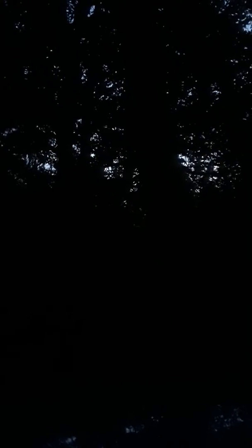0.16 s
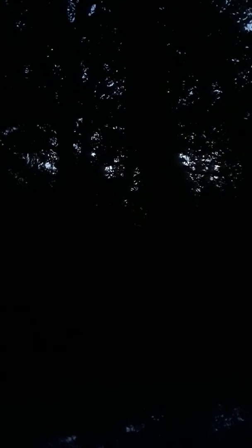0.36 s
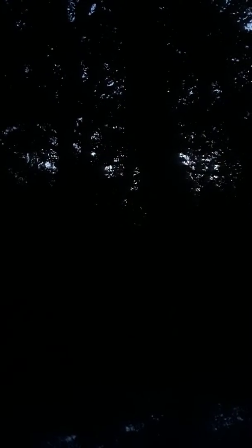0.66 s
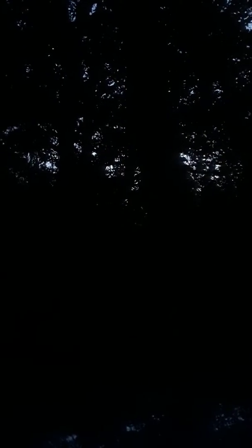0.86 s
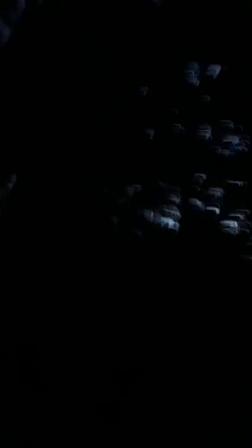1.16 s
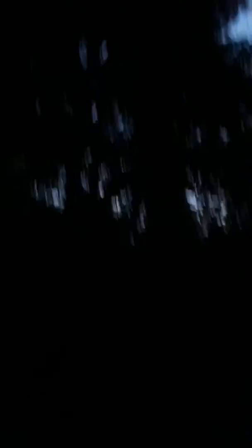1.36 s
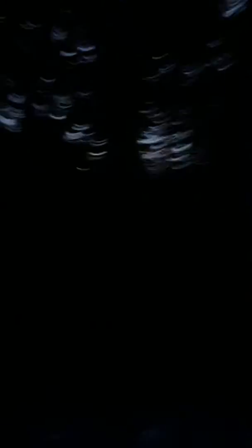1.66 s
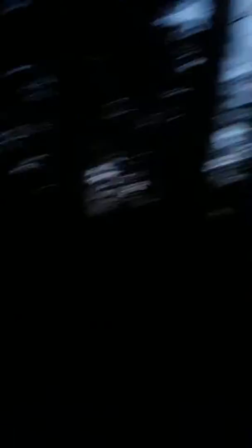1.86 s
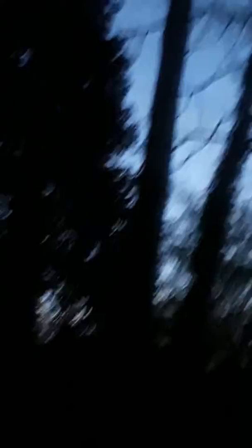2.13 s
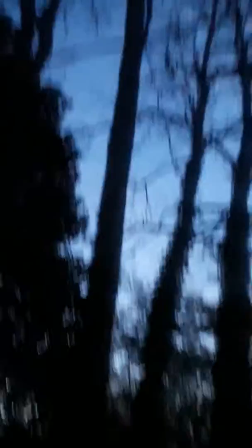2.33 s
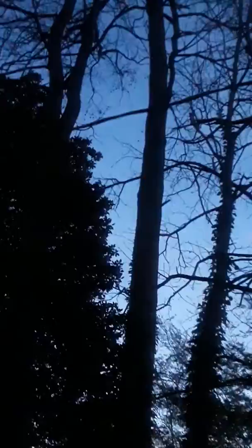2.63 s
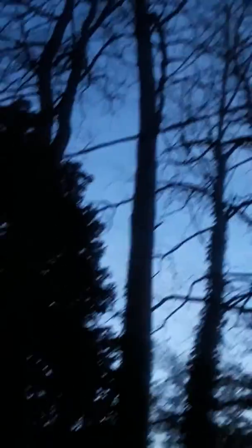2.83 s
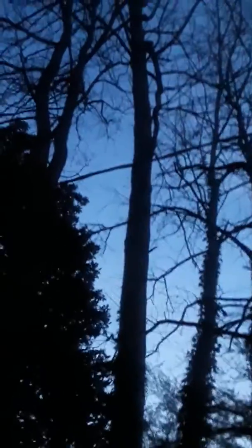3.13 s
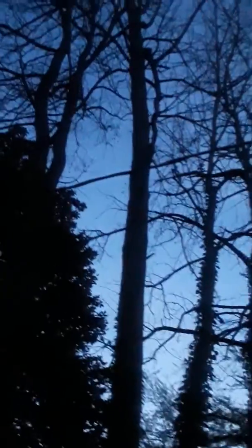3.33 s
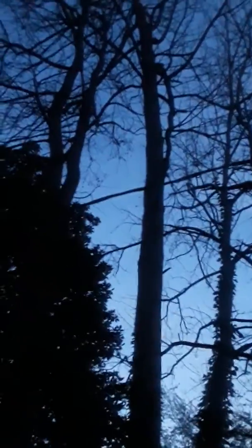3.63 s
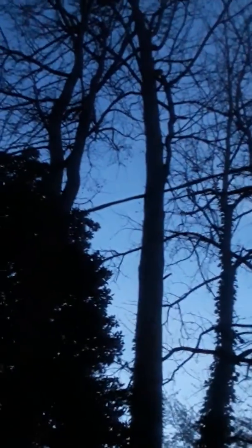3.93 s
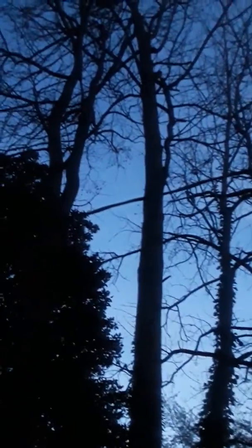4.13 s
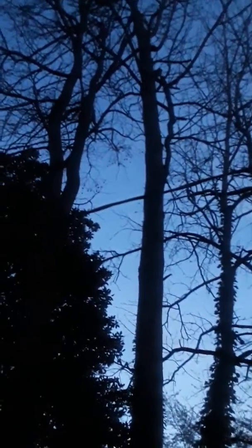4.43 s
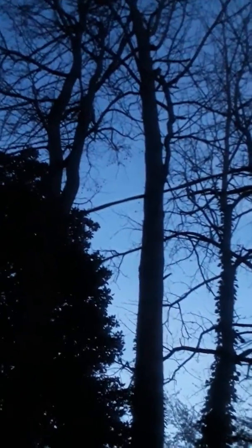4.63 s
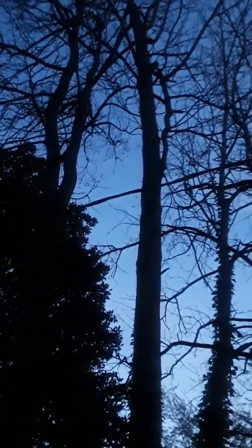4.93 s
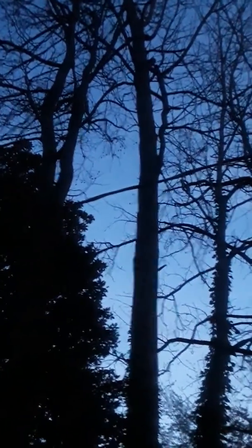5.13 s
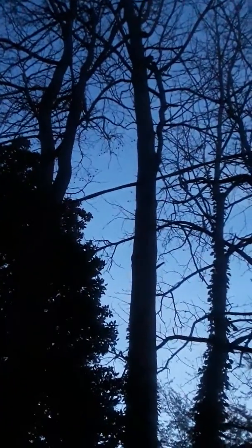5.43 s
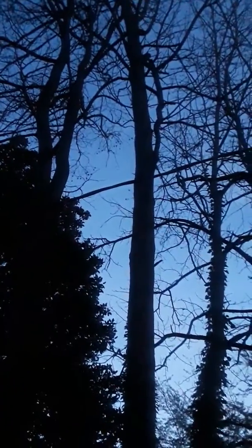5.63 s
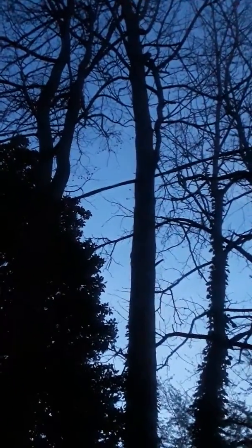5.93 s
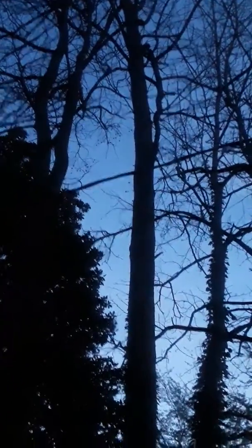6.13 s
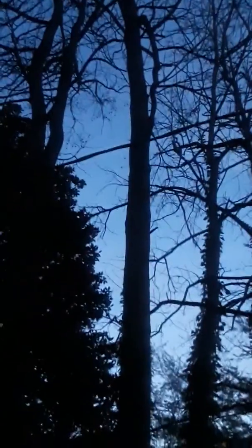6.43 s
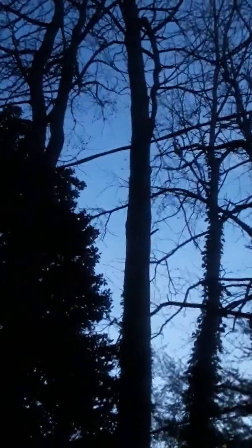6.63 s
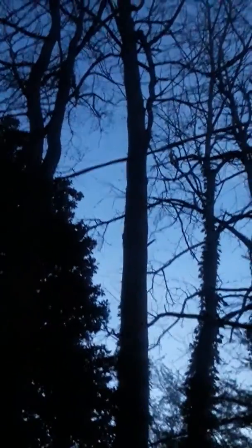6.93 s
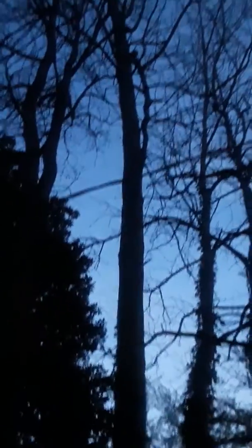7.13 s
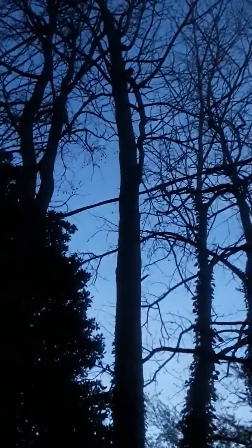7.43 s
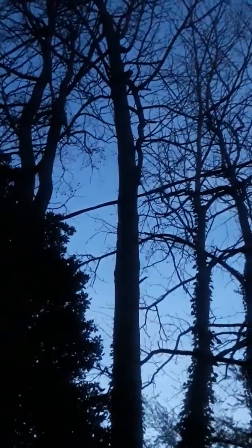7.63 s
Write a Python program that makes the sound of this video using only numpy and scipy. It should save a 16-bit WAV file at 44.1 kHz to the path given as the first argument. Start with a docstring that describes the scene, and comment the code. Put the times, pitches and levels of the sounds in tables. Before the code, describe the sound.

In quiet woods at dusk, an owl's faint low hoots grow louder and higher, each swooping up and down. Cloth rustles close to the hand-held microphone after one second. A long hoot falls away, then a second owl joins with short whoops and quavering wails while the first caws hoarsely. Their calls overlap and bounce off trunks with a brief woody echo, over distant frogs, soft air and a thin buzz.

```python
"""Two barred owls in woods at dusk, over low rumble, soft air, a thin pulsing buzz and a far frog chorus.
One owl builds up a run of arched hoots, shaped by its throat, while a few small birds whistle far off.
Cloth rustles in grainy noise from 1 s on, and a hand-held camera swings round to the trees; the frogs swell.
From 3.5 s the mate answers with whoops and wails, the first owl caws harshly, and they caterwaul in a duet.
Each call is a stack of harmonics, scattered back by the trunks as decaying noise echoes."""
import sys
import numpy as np
from scipy import signal
from scipy.fft import rfft, irfft, next_fast_len
from scipy.io import wavfile
from scipy.ndimage import uniform_filter1d, map_coordinates

SR = 44100
rng = np.random.default_rng(int(sys.argv[2]) if len(sys.argv) > 2 else 0)


def wav_record(signal):
    """Record a signal, one row per channel, as 16-bit PCM in the file named by sys.argv[1]."""
    frames = np.transpose(np.atleast_2d(signal))
    bounded = np.clip(frames, -1, 1)
    # unit amplitude maps onto the largest positive 16-bit level
    quanta = np.round(bounded * 32767).astype(np.int16)
    wavfile.write(sys.argv[1], SR, quanta)


N = 342657  # samples

# How fast scatter from the nearest trees dies: (frequency [Hz], t60 [s])
NEAR_TRUNK_DECAY = [(300, 0.072), (3000, 0.12)]
# The camera's swing towards the trees: (time [s], share of the turn [0-1])
CAMERA_TURN = [(1.5, 0.13), (2.3, 0.79)]
HOOT_FULL_HZ = 490.5  # under this the first owl's fundamental slips out of its throat's resonance


def amp(db):
    """Decibels to gain."""
    return 10 ** (np.asarray(db) / 20)


def unit(x):
    """Scaled to rms 1."""
    return x / np.sqrt(np.mean(x ** 2) + 1e-20)


def along(points, hz):
    """(frequency, value) points read on a log frequency axis."""
    f, v = np.transpose(points)
    return np.interp(np.log(hz + 1), np.log(f + 1), v)


def curves(rows, index):
    """Each column after the time, at the given samples."""
    s, *columns = np.transpose(rows)
    return [np.interp(index / SR, s, column) for column in columns]


def span(rows):
    """The samples that a gesture covers, and a gate with soft edges."""
    edge_s = .01
    start = max(int((rows[0][0] - edge_s) * SR), 0)
    end = min(int((rows[-1][0] + edge_s) * SR), N)
    index = np.arange(start, end)
    to_nearest_edge = np.minimum(index - index[0], index[-1] - index)
    return index, np.clip(to_nearest_edge / (edge_s * SR), 0, 1)


def wobble(rate, size=N):
    """A smooth random curve, rate knots a second."""
    knots = rng.standard_normal(int(size * rate / SR) + 4)
    return map_coordinates(knots, [np.arange(size) * rate / SR])


def filtered(x, response):
    """x times a response of frequency."""
    m = next_fast_len(N + SR // 2)
    return irfft(rfft(x, m) * response(np.fft.rfftfreq(m, 1 / SR)), m)[..., :N]


def coloured(x, spectrum):
    """x shaped by a spectrum, at rms 1."""
    return unit(filtered(x, lambda hz: amp(along(spectrum, hz))))


def spread(pair, side_db):
    """Two unrelated signals as middle and side of a stereo pair, at rms 1."""
    return unit(pair[0] + amp(side_db) * np.array([pair[1], -pair[1]]))


def evening():
    """A distant low rumble and the soft rush of the air among the trees, both slowly wavering noise."""
    # Relative spectra: (frequency [Hz], density [dB per Hz])
    rumble_spectrum = [(22, -31), (40, -13.5), (62, -2), (85, 1.5), (120, 2), (200, -1), (300, -4.5),
                       (600, -16.5), (1500, -46.5)]
    air_spectrum = [(35, -39.5), (100, -17.5), (300, -7), (500, -3), (850, -5.5), (1300, -12.5),
                    (2000, -25), (3500, -37.5), (4200, -18.5), (5300, -50), (15000, -47)]
    rumble_noise = coloured(rng.standard_normal((2, N)), rumble_spectrum)
    rumble = amp(-47.0 + 0.36 * wobble(2.8)) * spread(rumble_noise, side_db=-25.0)
    air_noise = coloured(rng.standard_normal((2, N)), air_spectrum)
    air = amp(-47.5 + 0.65 * wobble(0.23)) * spread(air_noise, side_db=-6.0)
    return rumble + air


def frogs(rate, peep_s, pitch_hz, scatter, rise):
    """Many far frogs: short rising peeps that overlap and blur into a shimmering band."""
    # Relative spectrum of the blur: (frequency [Hz], density [dB per Hz])
    blur_spectrum = [(1900, -54.5), (2350, -7), (2600, 17.5), (2760, 13), (2950, 4), (3400, -38),
                     (4150, -12.5), (4500, -11), (5100, -83), (7000, -72)]
    # Swell of the chorus: (time [s], level [dB])
    swell = [(0, -60.5), (1, -56), (2.1, -54.5), (2.5, -47.5), (3.8, -42.5), (7.1, -43), (7.77, -45.5)]
    t = np.arange(int(peep_s * SR)) / SR
    peeps = np.zeros((2, N + len(t)))
    for when, pitch, size, side in rng.random((int(rate * N / SR), 4)):
        hz = pitch_hz * (1 + scatter * (2 * pitch - 1) + rise * (t / peep_s - .5))
        tone = np.sin(2 * np.pi * np.cumsum(hz) / SR)
        peep = amp(-12 * size) * np.hanning(len(t)) * tone
        peeps[int(side * 2), int(when * N):][:len(t)] += peep
    blur = coloured(rng.standard_normal((2, N)), blur_spectrum)
    pair = spread(blur + amp(-2.5) * unit(peeps[:, :N]), side_db=-8.5)
    shimmer_db = 1.5 * wobble(5.9)
    return amp(curves(swell, np.arange(N))[0] + shimmer_db) * pair * amp([[-1.3], [1.3]])


def buzz(tick_hz, depth):
    """A thin high hiss that pulses about a hundred times a second, most clearly once the camera has turned."""
    # Relative spectrum: (frequency [Hz], density [dB per Hz])
    hiss_spectrum = [(4500, -46), (6500, -15.5), (7700, -6), (8900, -15), (10500, 2), (11700, 2),
                     (13500, -3.5), (14600, -15.5), (15500, -28.5)]
    # Loudness course: (time [s], level [dB])
    hiss_level = [(0, -57.5), (1.8, -60), (2.6, -58.5), (4.88, -58), (4.98, -62.5), (7.77, -62)]
    phase = 2 * np.pi * np.cumsum(tick_hz * (1 + .004 * wobble(24))) / SR
    ticks = ((1 + np.cos(phase)) / 2) ** 8  # the power narrows each pulse
    turned = curves(CAMERA_TURN, np.arange(N))[0]
    pulsing = 1 + depth * ticks * (1 + turned) / 2
    hiss = coloured(rng.standard_normal((2, N)) * pulsing, hiss_spectrum)
    return amp(curves(hiss_level, np.arange(N))[0]) * spread(hiss, side_db=-2.5) * amp([[-1], [1]])


def woods(x, decay, build_s):
    """Scatter from the trunks builds up, then each frequency dies at its own speed; every stretch meets new paths."""
    out = np.zeros(N + 2 * SR)
    hop = SR // 3
    padded = np.pad(x, (hop, 2 * hop))
    starts = range(0, N + hop, hop)
    hz, t, noise = signal.stft(rng.standard_normal((len(starts), SR // 2)), SR, nperseg=256)
    fade = amp(-60 * t / along(decay, hz)[:, None])
    build = 1 - np.exp(-t / build_s)
    tails = signal.istft(noise * fade * build, SR, nperseg=256)[1]
    window = np.hanning(2 * hop)
    for start, tail in zip(starts, tails):
        piece = padded[start:start + 2 * hop] * window
        echo = signal.fftconvolve(piece, tail)
        # each echo carries the energy of its stretch
        out[start:start + len(echo)] += echo * np.sqrt(np.sum(piece ** 2) / (np.sum(echo ** 2) + 1e-20))
    return out[hop:hop + N]


def from_trees(x):
    """The owls start straight ahead; as the camera turns, they come to reach the right port first."""
    # Sound at the two ports: (frequency [Hz], right port's lead [rad], right minus left [dB])
    port_response = [(60, .1, 3.5), (390, 1.01, -2), (580, 1.49, 2), (1070, 2.15, 1.2), (1650, 3.37, 3.5),
                     (2970, 7.13, 0), (7560, 10, 9.5)]

    def ports(hz):
        lead = along([(f, radians) for f, radians, _ in port_response], hz)
        tilt_db = along([(f, db) for f, _, db in port_response], hz)
        right = amp(tilt_db / 2) * np.exp(1j * lead / 2)
        return np.array([1 / right, right])

    turned = curves(CAMERA_TURN, np.arange(N))[0]
    return (1 - turned) * x + turned * filtered(x, ports)


def octaves_under(hz, limit_hz):
    """How far a pitch lies below a limit, in octaves."""
    return np.maximum(np.log2(limit_hz / hz), 0)


def arch(top_s, top_hz, rise_s, fall_s, reach, count=41):
    """A note that swoops up to its top and sinks: rise and fall times each span an octave."""
    u = np.linspace(-reach[0], reach[1], count)
    return top_s + u * np.where(u < 0, rise_s, fall_s), top_hz / (1 + u ** 2)


def syrinx(note, throat, jitter, rasp, rasp_rate, count=19):
    """One note: a fundamental, and overtones that light up as they sweep through the throat's resonances."""
    index, gate = span(note)
    # square roots of gain are smoothed here and squared again below
    softened = [(s, hz, amp(first / 2), amp(over / 2)) for s, hz, first, over in note]
    hz, first, over = uniform_filter1d(np.array(curves(softened, index)), size=400, axis=1)
    phase = 2 * np.pi * np.cumsum(hz * (1 + jitter * wobble(rasp_rate, len(index)))) / SR
    k = np.arange(2, count + 1)[:, None]  # harmonic numbers
    gains = throat(k * hz)
    gains = gains / np.linalg.norm(gains, axis=0)
    # uneven cycles smear the higher overtones most
    smear = rasp * np.sqrt(2 - 2 / k) * np.array([wobble(rasp_rate, len(index)) for _ in k])
    fundamental = first ** 2 * np.sin(phase)
    overtones = over ** 2 * np.sum(gains * np.sin(k * phase + smear), axis=0)
    return np.pad(np.sqrt(2) * gate * (fundamental + overtones), (index[0], N - 1 - index[-1]))


def hoot(s, hz, first_db, over_db, db_per_octave=28):
    """A shut-beak note: nearly pure at the top, reedy on its flanks."""
    # Throat with the beak shut: (frequency [Hz], relative gain [dB])
    throat_curve = [(350, -2.5), (480, 9), (590, 8.5), (800, -9.5), (980, -12), (1090, -23), (1320, -39),
                    (1620, -20), (1900, -50), (2190, -30.5), (2500, -52), (5000, -80.5)]
    # Overtones, strongest when the second harmonic meets the throat's resonance: (pitch [Hz], gain [dB])
    overtone_curve = [(170, -13.5), (230, -4.5), (300, -0.5), (400, -15), (480, -17.5), (550, -17.5),
                      (580, -29.5), (610, -33.5)]
    first = first_db - db_per_octave * octaves_under(hz, min(hz.max(), HOOT_FULL_HZ))
    note = np.transpose([s, hz, first, over_db + along(overtone_curve, hz)])
    return syrinx(note, lambda f: amp(along(throat_curve, f)), jitter=0.0044, rasp=0.078, rasp_rate=64)


def arched_hoots():
    """The first owl's hoots, each swooping up to a top and down again with its beak nearly shut."""
    # (time of the top [s], top pitch [Hz], rise per octave [s], fundamental level at the top [dB],
    #  overtone level before the pitch-dependent gain [dB])
    hoot_rows = [(.338, 282.3, 0.085, -55, -41.5), (0.794, 344, 0.093, -38.5, -33),
                 (1.213, 445, .08, -24.5, -28), (1.624, 463.5, .082, -20.5, -24.5),
                 (2.04, 481, 0.081, -16.5, -22), (2.439, 506, 0.08, -15, -19.5),
                 (3.16, 399, .058, -28, -32.5), (7.531, 582.3, 0.093, -16, -24.5)]
    fall_s, reach = .058, (1.14, 1.2)  # reach in rise and fall times
    return sum(hoot(*arch(s, hz, rise_s, fall_s, reach), first_db, over_db)
               for s, hz, rise_s, first_db, over_db in hoot_rows)


def birds():
    """A few thin slurred whistles from small birds, blurred by distance."""
    # (start [s], length [s], start pitch [Hz], end pitch [Hz], direct peak level [dB])
    whistle_rows = [(0.336, 0.28, 2920, 4250, -70), (1.426, 0.17, 1950, 1720, -61),
                    (2.174, 0.13, 3174, 2970, -58.5)]
    out = np.zeros(N)
    for s, length, start_hz, end_hz, db in whistle_rows:
        u = np.linspace(0, 1, int(length * SR))
        slur_hz = start_hz + (end_hz - start_hz) * np.sqrt(u)
        hz = slur_hz * (1 + 0.023 * wobble(300, len(u)))
        swell = np.sin(np.pi * np.sqrt(u))
        out[int(s * SR):][:len(u)] += amp(db) * swell * np.sin(2 * np.pi * np.cumsum(hz) / SR)
    return out + amp(14) * woods(out, NEAR_TRUNK_DECAY, build_s=.01)


def rustles(grain_db):
    """Sleeves rub: fibres catch and slip in a grainy hiss."""
    # Cloth strokes and snaps: (time of the peak [s], rise [s], fade t60 [s], level [dB])
    stroke_rows = [(1.005, .002, 0.024, -46), (1.054, 0.00094, 0.0058, -41.5), (1.111, 0.053, 0.56, -48.5),
                   (1.188, 0.0018, 0.026, -38.5), (1.222, .002, 0.022, -42.5), (1.255, 0.034, 0.17, -36),
                   (1.425, 0.006, 0.49, -45.5), (1.898, 0.0072, 0.076, -41.5), (2.088, 0.006, 0.68, -51),
                   (3.142, 0.022, 0.65, -45), (3.55, 0.035, 0.98, -49), (5.275, .03, 0.8, -48),
                   (6.397, 0.044, 0.48, -43.5)]
    # Relative spectrum: (frequency [Hz], density [dB per Hz])
    cloth_spectrum = [(60, -41), (300, 6), (1200, 3.5), (2200, 0), (4000, 3), (5500, -1), (7500, 0.5),
                      (9000, -6.5), (15500, -8.5)]
    t = np.arange(N) / SR
    level = np.zeros(N)
    for s, rise, t60, db in stroke_rows:
        onset = np.exp(-(np.minimum(t - s, 0) / rise) ** 2)
        level += amp(db - 60 * np.maximum(t - s, 0) / t60) * onset
    grains = rng.standard_normal((2, N)) * amp(grain_db * wobble(500) + 1.8 * wobble(50))
    return level * spread(coloured(grains, cloth_spectrum), side_db=-0.5) * amp([[-1.3], [1.3]])


def drawl(rows, count=120):
    """A hoot drawn out along its own course of pitch and effort, quavering as it sinks."""
    quaver_per_s, quaver_depth, quaver_db = 33, .035, 0.5  # depth and dB per octave under full pitch
    s = np.linspace(rows[0][0], rows[-1][0], count)
    hz, effort_db = curves(rows, s * SR)
    quaver = octaves_under(hz, HOOT_FULL_HZ) * wobble(quaver_per_s)[(s * SR).astype(int)]
    effort_db = effort_db + quaver_db * quaver
    return hoot(s, hz * (1 + quaver_depth * quaver), effort_db, effort_db - 4.5)


def drawls():
    """The first owl's two long drawls, falling away in pitch."""
    # One list per drawl, before the quaver: (time [s], pitch [Hz], effort [dB])
    drawl_courses = [
        [(2.545, 212, -18), (2.58, 402, -16), (2.605, 525.6, -16), (2.64, 549, -14), (2.74, 543.3, -16),
         (2.78, 437, -19), (2.82, 322.5, -16), (2.88, 231.5, -22), (2.95, 205, -18), (3.02, 200, -17.5),
         (3.1, 165, -17.5)],
        [(5.7, 291.2, -28), (5.74, 452.3, -14.5), (5.775, 570.3, -20.5), (5.8, 618.5, -17), (5.832, 484, -19),
         (5.865, 465, -14.5), (5.9, 384, -23.5), (5.94, 365, -24), (5.965, 305, -18), (6.03, 272, -19),
         (6.09, 225, -22.5)],
    ]
    return sum(drawl(rows) for rows in drawl_courses)


def wail(held, gain_db, db_per_octave=34, count=160):
    """The mate scoops up, breaks into the held note and drops off its end."""
    # Mate's throat: (frequency [Hz], relative gain [dB])
    throat_curve = [(600, 11), (900, -9.5), (1350, -35), (2000, -24.5), (2500, -20.5), (3300, -50),
                    (7000, -72.5)]
    # Overtones, strongest when the second harmonic meets the throat's resonance: (pitch [Hz], gain [dB])
    overtone_curve = [(240, -14), (320, -5.5), (410, -20.5), (600, -28.5)]
    scoop_s, break_s, drop_s = .047, .014, 0.037  # way up, jump in register, way down
    scoop_from, scoop_to, drop_to = .46, .72, 0.33  # shares of the held pitch
    (start, start_hz, start_db), (end, end_hz, end_db) = held[0], held[-1]
    rows = [(start - break_s - scoop_s, scoop_from * start_hz, start_db - 4),
            (start - break_s, scoop_to * start_hz, start_db),
            *held,
            (end + drop_s, drop_to * end_hz, end_db - 1.5)]
    s = np.linspace(rows[0][0], rows[-1][0], count)
    hz, db = curves(rows, s * SR)
    full_hz = min(407.7, end_hz)  # below this the fundamental slips out of the throat's resonance
    first = db - db_per_octave * octaves_under(hz, full_hz)
    note = np.transpose([s, hz, first, db + along(overtone_curve, hz)])
    voice = syrinx(note, lambda f: amp(along(throat_curve, f)), jitter=0.0071, rasp=0.54, rasp_rate=160)
    return amp(gain_db) * voice


def whoop(s, hold_s, hz, db):
    """A very short wail that domes a little and sags."""
    sag_hz = 420 * hold_s  # 420 Hz per second
    bulge = .045  # share of the pitch
    middle_hz = hz * (1 + bulge) - sag_hz / 2
    held = [(s, hz, db), (s + hold_s / 2, middle_hz, db), (s + hold_s, hz - sag_hz, db)]
    return wail(held, gain_db=-0.5)


def mate_calls():
    """The mate's short whoops and two held wails, the long one breaking back to the low register."""
    # (time of the break to the high register [s], hold [s], pitch at the break [Hz], level before gain [dB])
    whoop_rows = [(3.548, 0.041, 499.3, -25.5), (3.949, 0.055, 585, -24), (4.312, 0.054, 588.2, -21),
                  (4.647, .056, 596, -20), (6.593, 0.032, 480, -27.5), (7.243, .072, 651.4, -23.5),
                  (7.656, .047, 592, -23)]
    # Held notes: (time [s], pitch [Hz], level before gain [dB])
    long_wail = [(4.865, 617.2, -19.5), (4.899, 630.7, -16.5), (4.931, 651, -27), (4.989, 650.6, -25),
                 (5.033, 652, -34.5), (5.141, 620.8, -15), (5.169, 611.5, -21), (5.185, 560, -33.5),
                 (5.209, 565, -32), (5.227, 533.4, -23.5), (5.285, 513, -23.5), (5.305, 402.6, -18.5),
                 (5.431, 405.5, -21), (5.51, 385, -23.5)]
    short_wail = [(6.13, 614.4, -22.5), (6.168, 618, -21), (6.186, 580.6, -31), (6.262, 636, -25),
                  (6.282, 645.4, -27), (6.406, 655, -37), (6.455, 642, -23.5)]
    whoops = sum(whoop(*row) for row in whoop_rows)
    return whoops + wail(long_wail, gain_db=1.0) + wail(short_wail, gain_db=1.0)


def resonance(hz, centre_hz, width_hz):
    """A peak with steep skirts."""
    return 1 / (1 + (2 * (hz - centre_hz) / width_hz) ** 4)


def caw(top_s, top_hz, rise_s, fall_s, first_db, over_db, start_hz, end_hz, ring_db, rasp_db, db_per_octave=22):
    """A hoarse arched note whose main resonances climb as the beak opens, the lowest one most."""
    def throat(hz):
        opening = np.linspace(start_hz, end_hz, hz.shape[1])
        lift = np.sqrt(opening / opening.mean())
        ring = amp(ring_db) * resonance(hz, 3000 * lift, 260)
        rasp = amp(rasp_db) * (amp(1) * resonance(hz, 2150 * lift, 790)
                               + amp(2.5) * resonance(hz, 4550 * lift, 950)
                               + amp(-8) * resonance(hz, 5790, 600)
                               + amp(-19.5) * resonance(hz, 7800, 1000))
        return resonance(hz, opening, 447) + amp(-10) * resonance(hz, 590, 650) + ring + rasp

    s, hz = arch(top_s, top_hz, rise_s, fall_s, reach=(.86, 1.05))
    first = first_db - db_per_octave * octaves_under(hz, HOOT_FULL_HZ)
    over = over_db - 7 * octaves_under(hz, top_hz)  # overtones fade 7 dB per octave below the top
    return syrinx(np.transpose([s, hz, first, over]), throat, jitter=0.0069, rasp=0.36, rasp_rate=160)


def harsh_caws():
    """The first owl's harsh caws, sung with an opening beak."""
    # (time of the top [s], top pitch [Hz], rise per octave [s], fall per octave [s],
    #  fundamental level at full pitch [dB], overtone level at the top [dB], beak resonance at the start [Hz],
    #  at the end [Hz], relative ring [dB], relative rasp [dB])
    caw_rows = [ (3.617, 483, .072, .058, -20.5, -26, 730, 1030, -24, -38),
                (3.985, 499.7, .088, .078, -22, -24, 986, 1177, -16.5, -28),
                (4.377, 499, .095, 0.088, -24, -24.5, 1006, 1390, -15, -26.5),
                (4.777, 590, 0.08, .072, -26.5, -23, 1110, 1350, -17.5, -46.5),
                (5.178, 598, .1, .078, -27.5, -25, 1050, 1514, -26.5, -54.5),
                (5.585, 556, .1, 0.077, -27.5, -27, 980, 1240, -32, -56),
                (6.695, 668, 0.097, 0.058, -23.5, -25, 1050, 1264, -6, -34),
                (7.04, 553.3, .09, .066, -26, -28.5, 1000, 1040, -4.5, -30.5), ]
    return sum(caw(*row) for row in caw_rows)


def owls():
    """Both birds and the answer of the woods, in which hoots, caws and mate have their own shares."""
    # How fast scatter from the deeper woods dies: (frequency [Hz], t60 [s])
    deep_decay = [(200, 0.33), (550, 0.41), (1200, 0.58), (3000, 0.17), (8000, 0.28)]
    hoots = arched_hoots() + drawls()
    mate = mate_calls()
    caws = harsh_caws()
    calls = hoots + caws + mate
    near = woods(amp(-6.0) * hoots + caws + amp(-2.5) * mate, NEAR_TRUNK_DECAY, build_s=0.013)
    far = woods(amp(-11.5) * calls + amp(-23.5) * caws, deep_decay, build_s=0.023)
    sideways = woods(amp(-37.0) * calls + amp(-23) * caws, deep_decay, build_s=.01)
    return from_trees(calls + near + far) + np.array([sideways, -sideways])


def scene():
    """The owls over the sounds of the evening."""
    chorus = frogs(rate=45, peep_s=0.0966, pitch_hz=2740, scatter=0.0444, rise=0.0599)
    background = evening() + chorus + buzz(tick_hz=101.5, depth=1.4)
    return background + owls() + birds() + rustles(grain_db=2.0)


def record(dry):
    """The camera keeps nothing above its band limit."""
    top_hz = 15750
    return filtered(dry, lambda hz: hz < top_hz)


dry = scene()
out = record(dry)
wav_record(out)
```